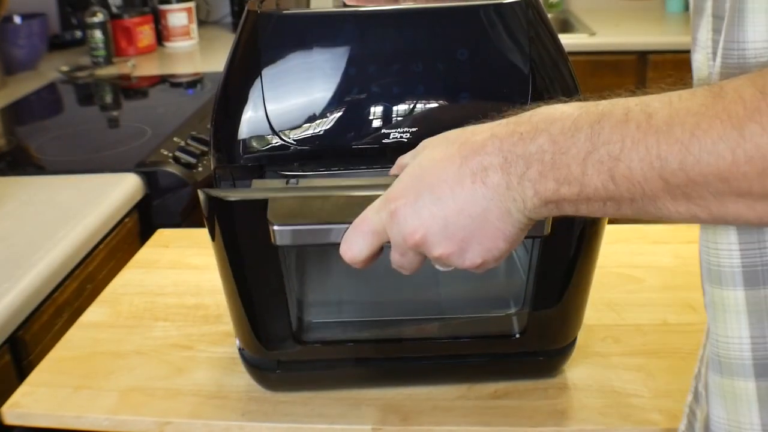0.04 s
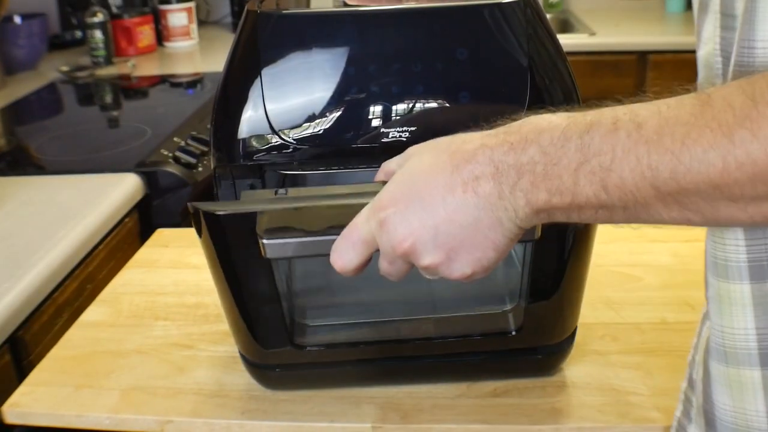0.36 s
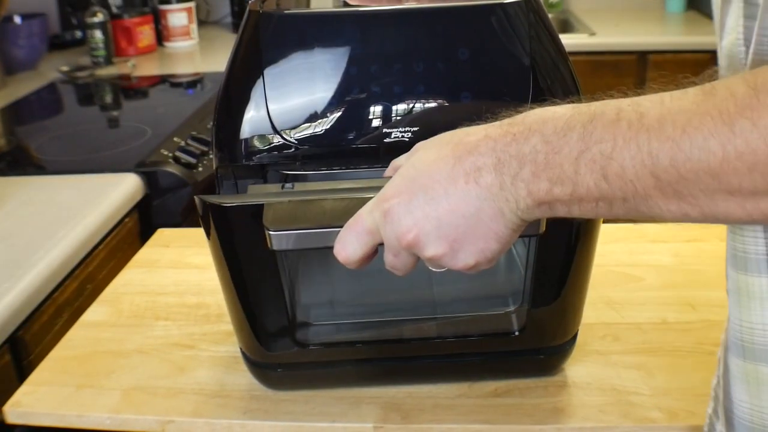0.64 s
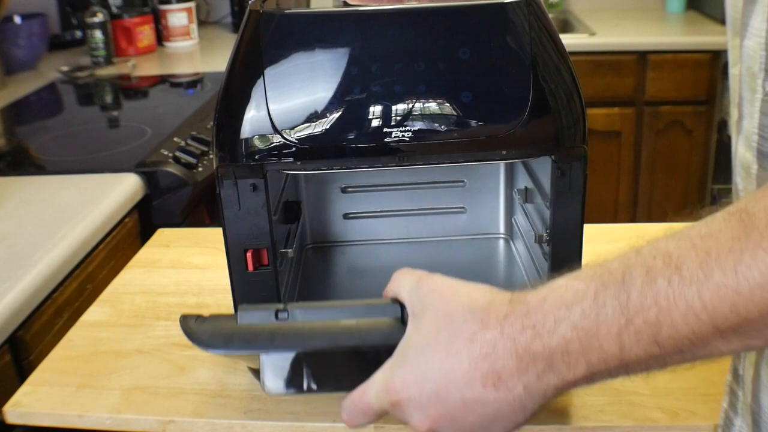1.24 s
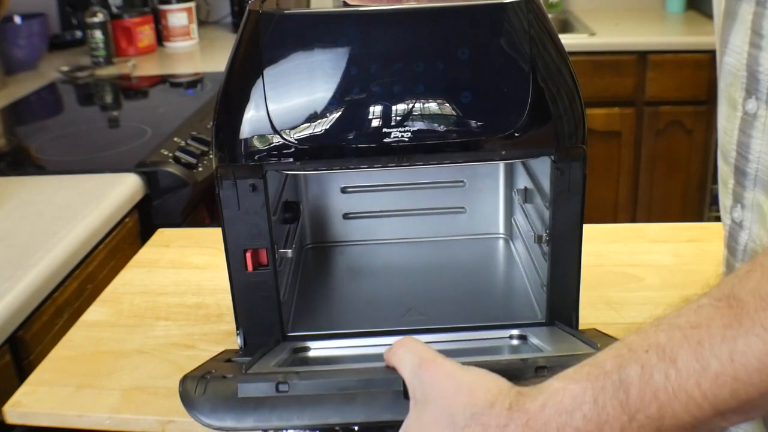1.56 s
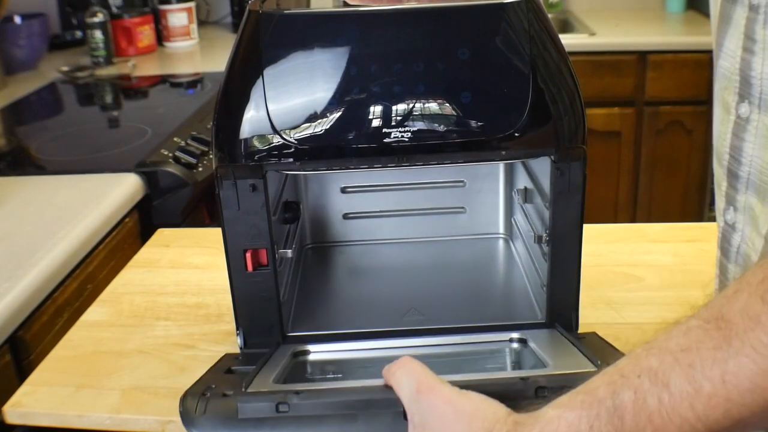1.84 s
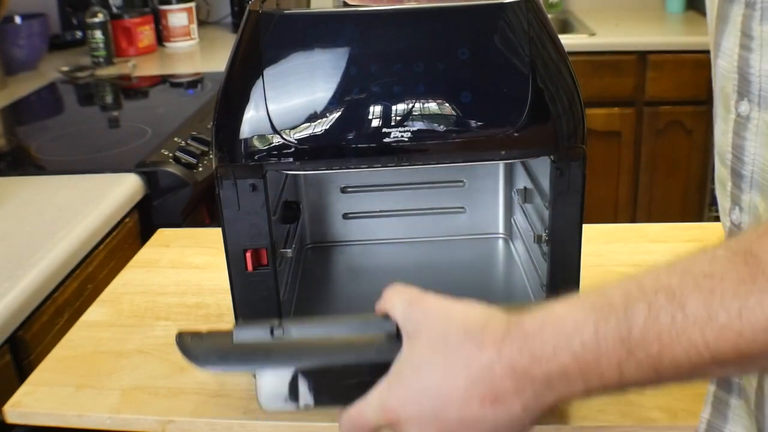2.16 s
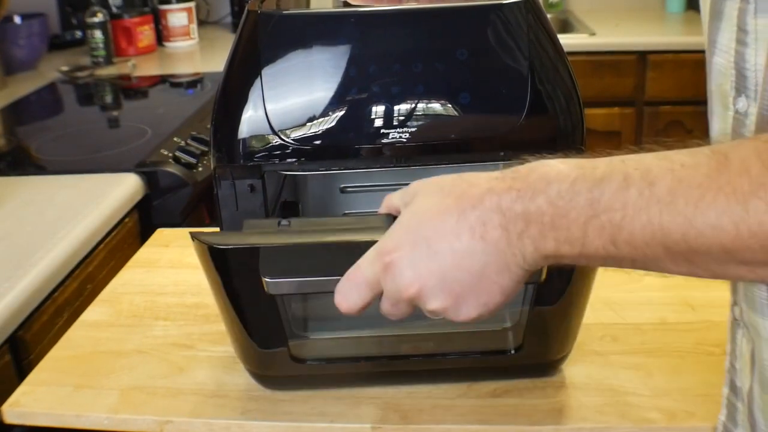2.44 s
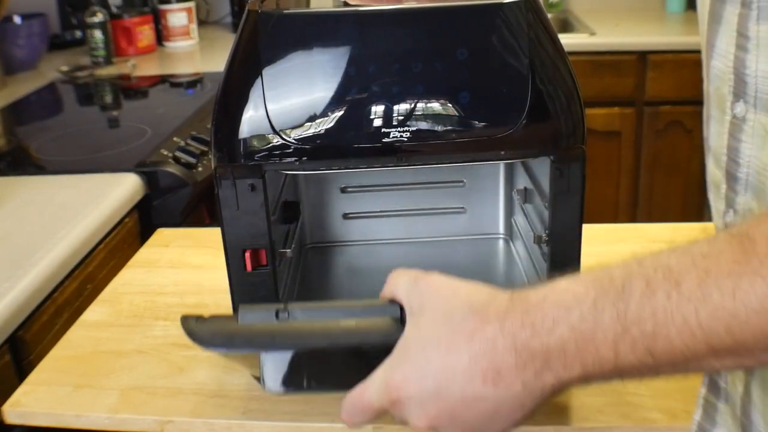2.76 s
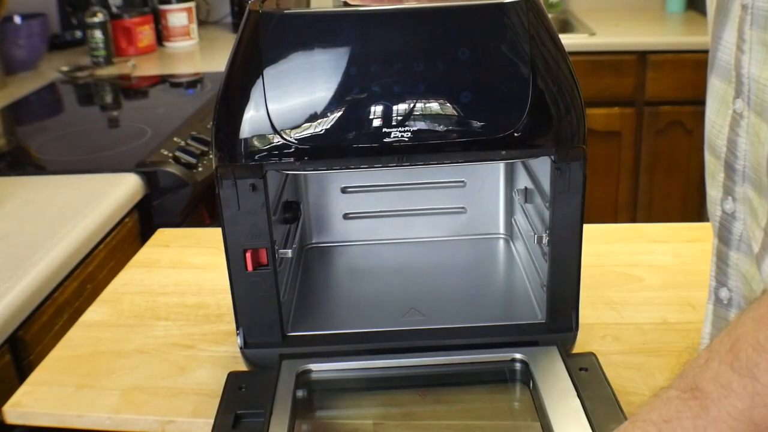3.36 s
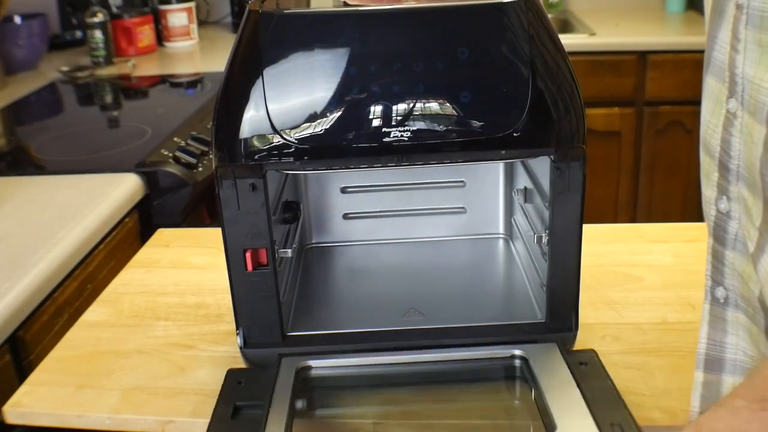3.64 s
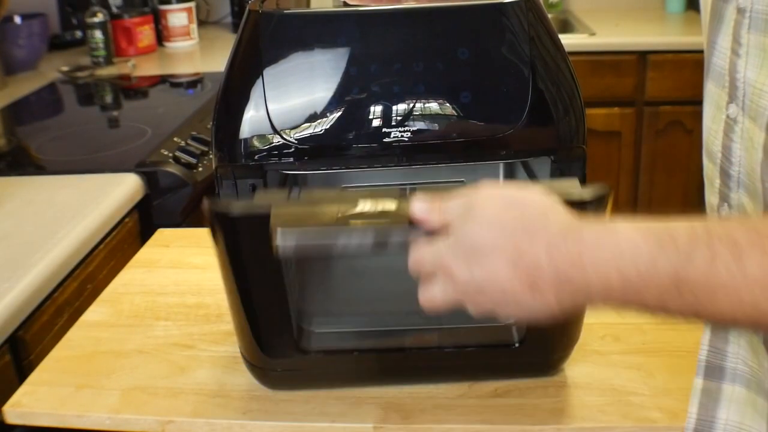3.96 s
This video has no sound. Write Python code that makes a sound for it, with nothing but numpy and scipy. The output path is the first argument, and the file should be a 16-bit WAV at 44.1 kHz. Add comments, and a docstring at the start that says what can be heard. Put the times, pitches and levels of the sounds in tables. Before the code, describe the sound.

A small oven door knocks and rubs lightly, then slams, rattling loose parts and leaving a faint steel ring. It opens again with softer bumps and a hinge scrape, centred in a slightly echoing kitchen with a low hum.

```python
"""The glass door of a countertop oven is handled, swung shut with a thud and a clack, and lowered again.
Each knock thumps the casing, cracks in the plastic and glass, clacks the pane and rings the steel
cavity; the slam rattles loose parts. Handle and latch tap and tick, hinge and hand rub.
The kitchen reverberates over air noise, a low hum and a faint whine."""
import sys
import numpy as np
from scipy import signal
from scipy.fft import rfft, irfft
from scipy.io import wavfile

SR = 44100
rng = np.random.default_rng(int(sys.argv[2]) if len(sys.argv) > 2 else 0)


def persist_wave(psi):
    """Save psi, clipped to +-1, as 16-bit WAV."""
    counts = np.round(np.clip(psi, -1, 1) * 32767).astype(np.int16)
    wavfile.write(sys.argv[1], SR, np.atleast_2d(counts).T)


N = 176400

# door knocks: t/s, thump/dB, body/dB, clack/dB, snap/dB
DOOR_KNOCKS = [(0.1785, -40.5, -45, -52, -76), (0.5715, -34, -54, -51.5, -65),
               (0.5872, -34.5, -41, -56.5, -55), (0.618, -37.5, -55, -67, -73),
               (0.9374, -67, -53, -54, -64), (1.2186, -61, -57, -53.5, -88),
               (1.9816, -33, -37.5, -52, -54.5), (2.021, -47, -46, -57, -94),
               (2.2158, -43, -50.5, -51.5, -92), (2.355, -34, -59, -35, -68), (2.4035, -46, -41, -32, -47),
               (2.4094, -21.5, -40, -23, -38), (2.413, -14.5, -20, -27.5, -30),
               (2.4505, -27, -23, -32.5, -38), (2.483, -41, -25, -50, -49), (2.7305, -43, -46, -44.5, -86),
               (2.9145, -47, -46.5, -54.5, -64), (2.9813, -46, -48, -49, -92),
               (2.998, -32.5, -54, -60, -70), (3.019, -43, -42.5, -61, -67), (3.1229, -31.5, -52, -51, -75),
               (3.8283, -35, -60, -42, -66), (3.906, -60, -45, -39, -52.5), (3.9217, -26.5, -64, -40, -76)]
# centres of thump, body, clack and snap: f/Hz
KNOCK_CENTRES_HZ = [170, 650, 2000, 7500]
BANDS_HZ = 45 * 2 ** (np.arange(26) / 3)  # third octaves
REF_S = .01  # a 0 dB hit has the energy of rms 1 held this long


def knocks():
    """Each knock cracks in the plastic and glass, thumps the casing and clacks the pane."""
    # casing modes: f/Hz, level/dB, t60/s
    casing_modes = [(111, -6, 0.11), (168.5, 7.5, 0.12), (239, 0.5, 0.099), (325.7, 2, 0.077)]
    # modes of the pane in its frame: f/Hz, level/dB, t60/s
    pane_modes = [(1486, 0.5, 0.11), (1656, 4.5, 0.025), (1980, 7.5, 0.019), (2842, -8.5, 0.12),
                  (3250, -9.5, 0.017)]
    # crack spectrum: f/Hz, level/dB, t60/s
    crack_colour = [(59.6, -34, 0.12), (156, -7, 0.061), (432, -5, 0.018), (1000, -6, 0.078),
                    (1490, -0.5, 0.054), (3030, -5.5, 0.1), (5200, -3.5, 0.06), (6470, -16, 0.066),
                    (7870, 3, 0.14), (9530, -15.5, 0.022), (15000, -25, 0.023)]
    contact_s, crack_db, pane_db = 0.00042, .5, -8
    out, casing = np.zeros(N), modes(casing_modes)
    # pane pitch shifts with the point of contact
    detune = 1 + 0.037 * rng.standard_normal((len(DOOR_KNOCKS), len(pane_modes)))
    cracks = bursts(crack_colour, knock_levels_db(BANDS_HZ))
    contact = 1 - np.exp(-np.arange(cracks.shape[1]) / SR / contact_s)  # builds as the parts meet
    for (s, thump_db, _, clack_db, _), crack, tune in zip(DOOR_KNOCKS, cracks, detune):
        pane = modes([(hz * k, db, t60) for (hz, db, t60), k in zip(pane_modes, tune)], size=4096)
        add(out, s, amp(crack_db) * contact * crack)
        add(out, s, -amp(thump_db) * casing)
        add(out, s, amp(clack_db + pane_db) * pane)
    return out


def knock_levels_db(hz):
    """Strength at the given frequencies, one row per knock."""
    return np.array([np.interp(np.log(hz), np.log(KNOCK_CENTRES_HZ), row[1:]) for row in DOOR_KNOCKS])


def cavity():
    """The steel cavity rings on after every knock, each time slightly detuned."""
    # modes of cavity and pane: f/Hz, level/dB, t60/s
    cavity_modes = [(171.6, 6, 1.07), (208.5, 6.5, 0.66), (304, -6, 0.72), (401, -3.5, 1.7), (453, 5, 0.62),
                    (556.5, 0, 0.4), (757.5, 6.5, 0.38), (976, -1.5, 0.87), (1170, 0.5, 0.85),
                    (1300, 0, 0.65), (1507, 0, 0.77), (2960, -15, 0.6), (3430, -15, 0.36), (5420, -4, 0.56),
                    (7600, 2, 0.23)]
    coupling_db = -16.5
    out, t = np.zeros(N), np.arange(SR) / SR
    hz = np.array(cavity_modes)[:, 0]
    detune = 1 + 0.00408 * rng.standard_normal((len(DOOR_KNOCKS), len(hz)))
    decays = np.array([amp(db) * fade(t, t60) for _, db, t60 in cavity_modes])
    for (s, *_), force_db, tune in zip(DOOR_KNOCKS, knock_levels_db(hz), detune):
        rings = decays * np.sin(np.outer(2 * np.pi * hz * tune, t))
        add(out, s, amp(force_db + coupling_db) @ rings)
    return out


def rattle():
    """Loose parts buzz after the slam, sag, then settle."""
    start_s, hold_s, level_db = 2.42, 0.15, -29.5
    sag_db_per_s, fall_db_per_s = 51, 148
    t = np.arange(N) / SR - start_s
    db = level_db - sag_db_per_s * np.clip(t, 0, hold_s) - fall_db_per_s * np.maximum(t - hold_s, 0)
    return (t > 0) * amp(db) * grit(scratches(spread_db=1), tilt_db_per_oct=1)


def taps():
    """The plastic handle and latch ring briefly; each spot has its own resonances."""
    # taps: t/s, level/dB, f1/Hz, f2/Hz, f3/Hz (strongest first)
    tap_events = [(0.1793, -44, 573, 1050, 1720), (0.2718, -41, 2400, 2080, 2720),
                  (0.5871, -40, 1350, 1540, 2720), (0.9379, -51.5, 1830, 2460, 3210),
                  (1.2196, -55, 1160, 1530, 2030), (2.9138, -50, 1440, 2260, 2460),
                  (2.982, -49, 1270, 1640, 1900)]
    t60_s, step_db = 0.019, -4.5
    out = np.zeros(N)
    for s, db, *pitches_hz in tap_events:
        add(out, s, amp(db) * modes([(hz, k * step_db, t60_s) for k, hz in enumerate(pitches_hz)]))
    return out


def ticks():
    """Tiny bright clicks of handling and of the catch."""
    # clicks: t/s, level/dB
    tick_events = [(0.2841, -58), (0.292, -62), (0.634, -60), (1.374, -62), (2.2732, -60), (2.414, -43.5),
                   (2.4495, -36), (3.157, -44)]
    # click spectrum: f/Hz, level/dB, t60/s
    tick_colour = [(800, -8, 0.057), (2500, -7.5, 0.035), (4950, -9, 0.0048), (8000, -2, 0.0016),
                   (10700, -18.5, 0.011), (15000, -10.5, .006)]
    out = np.zeros(N)
    clicks = bursts(tick_colour, np.zeros((len(tick_events), len(BANDS_HZ))))
    for (s, db), click in zip(tick_events, clicks):
        add(out, s, amp(db) * click)
    return out


def rubs():
    """Hinge and hand rub in short swells; the swinging hinge adds a hollow scrape."""
    # rubs: t/s, length/s, level/dB, tilt/(dB/oct)
    rub_events = [(0.057, 0.067, -48, -2.5), (0.249, 0.069, -45, -0.5), (0.56, 0.062, -39, -2.5),
                  (2.34, 0.12, -35, -2), (2.991, 0.06, -43, -1), (3.125, 0.088, -45.5, -0.5),
                  (3.802, 0.14, -40, -1), (3.917, 0.093, -35, -1.25)]
    # hinge scrapes: t/s, length/s, level/dB
    scrape_events = [(2.975, 0.097, -49), (3.895, 0.17, -43)]
    scrape_hz, width_oct = 935, 1
    friction = scratches(spread_db=0.5)
    hinge = tint(scratches(spread_db=0.5), lambda f: np.exp(-(np.log2(f / scrape_hz) / width_oct) ** 2))
    rubbing = sum(swell(s, length_s, db) * grit(friction, tilt) for s, length_s, db, tilt in rub_events)
    scraping = unit(hinge) * sum(swell(*row) for row in scrape_events)
    return rubbing + scraping


def scratches(spread_db):
    """A stream of tiny uneven contacts, each a short decay of noise."""
    contacts_per_s, t60_s = 700, 0.026
    hits = rng.random(N) < contacts_per_s / SR
    strength = amp(spread_db * np.minimum(rng.exponential(size=N), 4))
    power = signal.lfilter([1], [1, -fade(2 / SR, t60_s)], (hits * strength) ** 2)
    return np.sqrt(power) * rng.standard_normal(N)


def grit(x, tilt_db_per_oct):
    """Scratches as heard through the door, brighter with more tilt."""
    # rub and rattle spectrum: f/Hz, density/dB
    grit_colour = [(50, -13), (110, 0), (220, 2), (400, -7.5), (900, -7.5), (1600, -9.5), (3500, -22),
                   (8400, -28), (10500, -37.5), (15000, -42)]
    return unit(tint(x, lambda f: amp(at(f, grit_colour) + tilt_db_per_oct * np.log2(f))))


def kitchen(x, size=48000):
    """Two unrelated diffuse reverberations of x, longest in the midrange."""
    # reverberation: f/Hz, level/dB re direct, t60/s
    room = [(61.5, 4, 0.16), (162, -6.5, 0.58), (380, -4, 0.65), (620, -0.5, 0.88), (1250, -5.5, 0.8),
            (2580, -2.5, 0.73), (6660, -8, 0.56), (14800, -3.5, 0.11)]
    t, tail = np.arange(size) / SR, 0
    build_s = 0.0039
    onset = 1 - np.exp(-(t / build_s) ** 2)
    noise = rfft(rng.standard_normal((2, 2, size)))
    for k, hz in enumerate(BANDS_HZ):
        decay = band(noise[k % 2], hz) * fade(t, at(hz, room, column=2)) * onset
        band_share = 2 * hz * (2 ** (1 / 6) - 2 ** (-1 / 6)) / SR
        tail = tail + with_energy(decay, band_share) * amp(at(hz, room))
    return signal.fftconvolve(x[None], tail, axes=1)[:, :N]


def room_tone():
    """Steady air noise; narrow noise bands give a wavering hum and a faint whine."""
    # air spectrum: f/Hz, density/dB
    air_colour = [(15, -40), (25, -8), (64, -11.5), (91, 3), (113, -12), (136, -1), (221, -7.5), (378, -3),
                  (433, -10), (567, -9), (997, -19.5), (1110, -19), (4040, -34.5), (5580, -31),
                  (15500, -49.5)]
    # hum and whine: f/Hz, width/Hz, level/dB
    hum_bands = [(59.6, 3.5, -62), (143.5, 6.2, -63), (245.7, 6.5, -60.5), (575.5, 11, -67),
                 (5370, 260, -80.5), (5660, 180, -79), (7050, 61, -82)]
    air_db = -51.5
    out = amp(air_db) * unit(tint(rng.standard_normal(N), lambda f: amp(at(f, air_colour))))
    for hz, width_hz, db in hum_bands:
        hum = tint(rng.standard_normal(N), lambda f: 1 / (1 + (2 * (f - hz) / width_hz) ** 2))
        out += amp(db) * unit(hum)
    return out


def modes(table, size=12000):
    """Decaying sines of a struck object; low ones start more slowly."""
    t = np.arange(size) / SR
    ring = sum(amp(db) * np.sin(2 * np.pi * hz * t) * fade(t, t60) * (1 - np.exp(-2 * t * hz))
               for hz, db, t60 in table)
    return with_energy(ring, REF_S * SR)


def bursts(colour, band_db, size=4096):
    """One noise burst per row of band levels; each band has its own decay."""
    t, out = np.arange(size) / SR, np.zeros((len(band_db), size))
    noise = rfft(rng.standard_normal((len(band_db), 2, size)))
    for k, hz in enumerate(BANDS_HZ):
        onset = 1 - np.exp(-(2 * t * hz) ** 2)
        decay = band(noise[:, k % 2], hz) * fade(t, at(hz, colour, column=2)) * onset
        out += with_energy(decay, REF_S * SR / 2) * amp(at(hz, colour) + band_db[:, k:k + 1])
    return out


def swell(s, length_s, db):
    """Envelope that rises, holds and falls."""
    out = np.zeros(N)
    add(out, s, amp(db) * signal.windows.tukey(int(length_s * SR), .5))
    return out


def band(spectrum, hz):
    """One third-octave band of a spectrum, as a signal."""
    f = np.linspace(1, SR / 2, spectrum.shape[-1])
    return irfft(spectrum * np.sqrt(np.maximum(1 - 3 * abs(np.log2(f / hz)), 0)))


def tint(x, gain):
    """Filter by gain(f/Hz)."""
    return irfft(rfft(x) * gain(np.maximum(np.fft.rfftfreq(N, 1 / SR), 1)), N)


def at(hz, table, column=1):
    """Table column interpolated over log frequency."""
    table = np.array(table, float)
    return np.interp(np.log(hz), np.log(table[:, 0]), table[:, column])


def amp(db):
    """dB to gain."""
    return 10 ** (np.asarray(db) / 20)


def unit(x):
    """Scale to rms 1."""
    return x / np.sqrt(np.mean(x ** 2))


def with_energy(x, energy):
    """Scale each row to this sum of squares."""
    return x * np.sqrt(energy / np.sum(x ** 2, axis=-1, keepdims=True))


def fade(t, t60_s):
    """Exponential decay."""
    return np.exp(-np.log(1000) * t / t60_s)


def add(out, s, x):
    """Mix x in at s seconds."""
    i = int(s * SR)
    out[i:i + len(x)] += x[:N - i]


def scene():
    """Oven in the centre; only the room gives a little width."""
    # stereo width: f/Hz, side/dB
    width = [(30, -25), (130, -45.5), (450, -37.5), (2000, -21), (5000, -14.5), (14000, -5.5)]
    radiate_hz = 91  # the small casing radiates little below this
    near_send_db, air_side_db = -11, 1
    door = tint(knocks() + rubs() + rattle(), lambda f: 1 / np.sqrt(1 + (radiate_hz / f) ** 8))
    near = ticks() + taps()
    wet_mid, wet_side = kitchen(door + amp(near_send_db) * near)
    mid = door + cavity() + near + wet_mid + room_tone()
    side = tint(wet_side + amp(air_side_db) * room_tone(), lambda f: amp(at(f, width)))
    return np.array([mid + side, mid - side])


def record(dry):
    """Steep low-pass on the top treble."""
    top_hz = 15700
    return signal.sosfilt(signal.ellip(10, .2, 80, top_hz, fs=SR, output="sos"), dry)


dry = scene()
out = record(dry)
persist_wave(out)
```